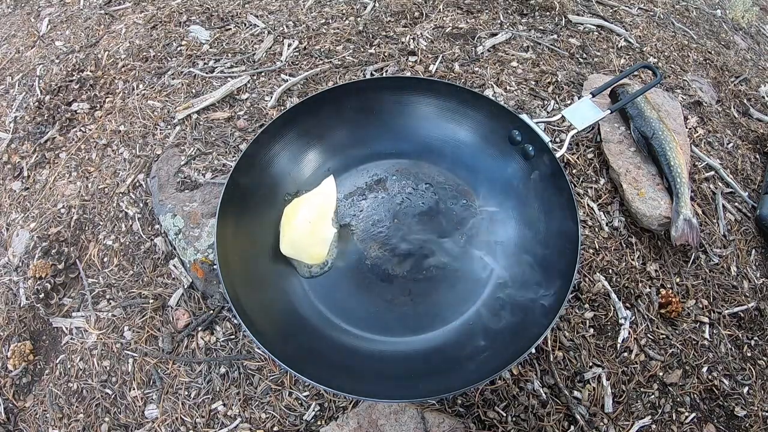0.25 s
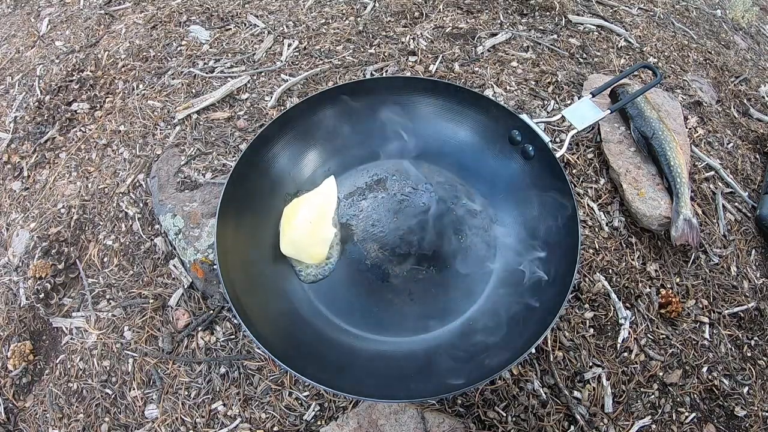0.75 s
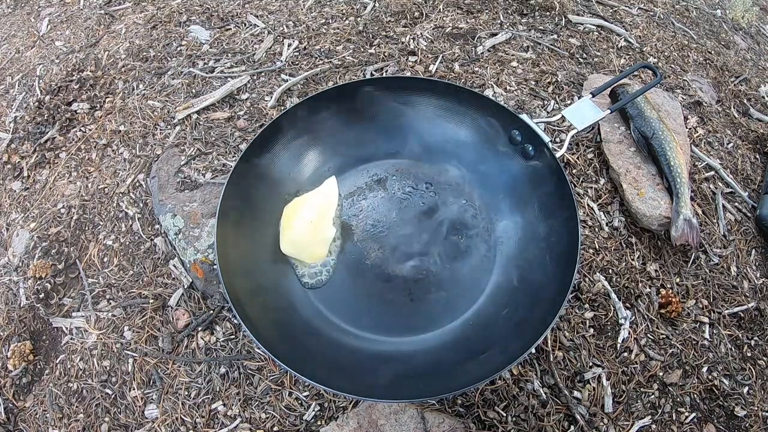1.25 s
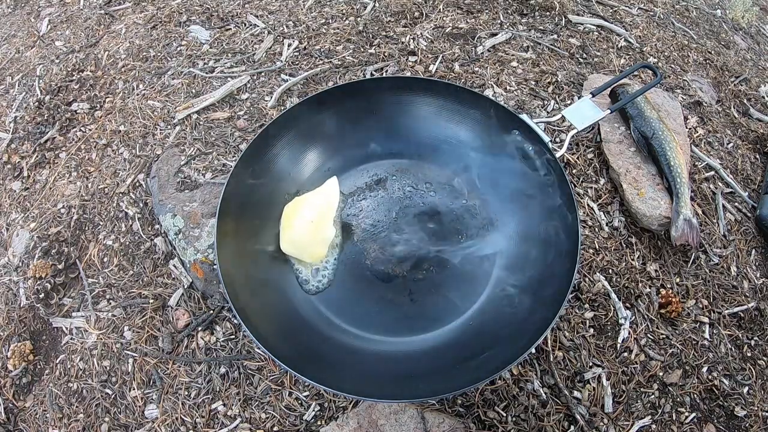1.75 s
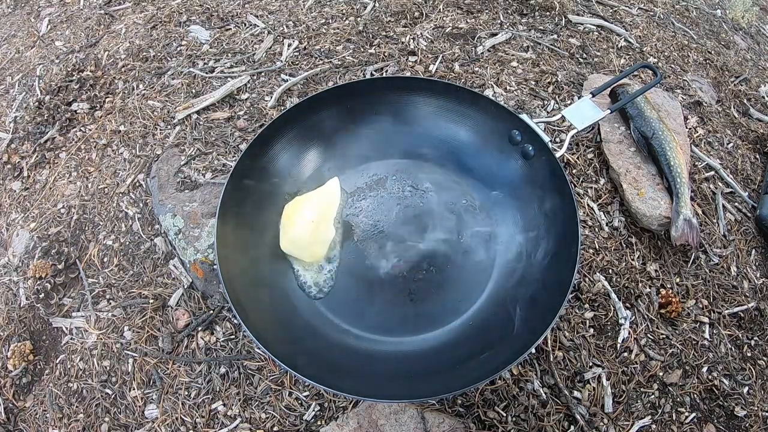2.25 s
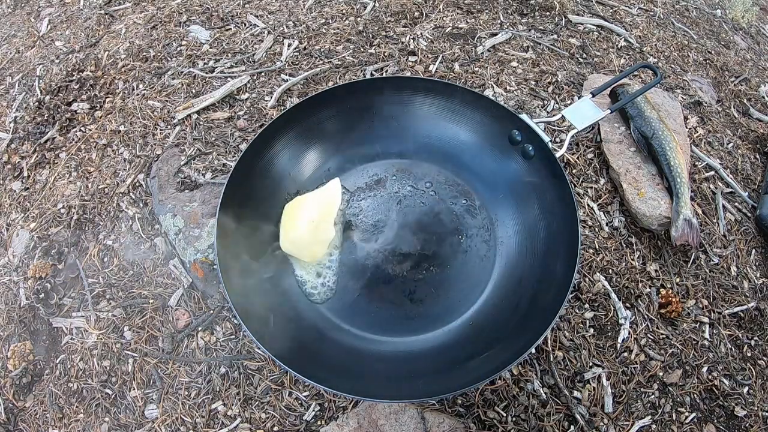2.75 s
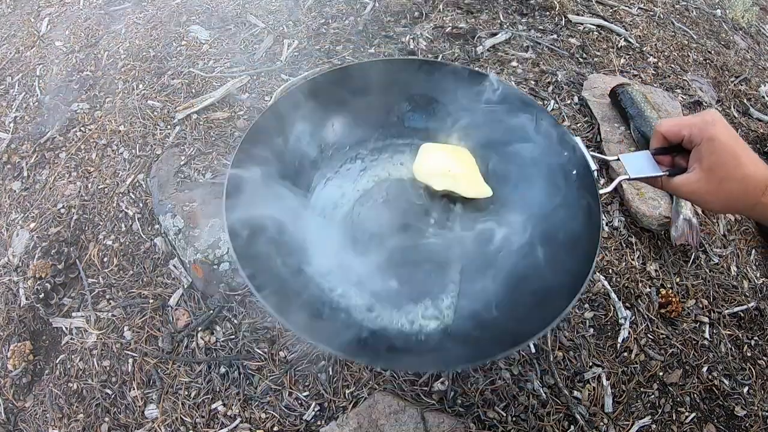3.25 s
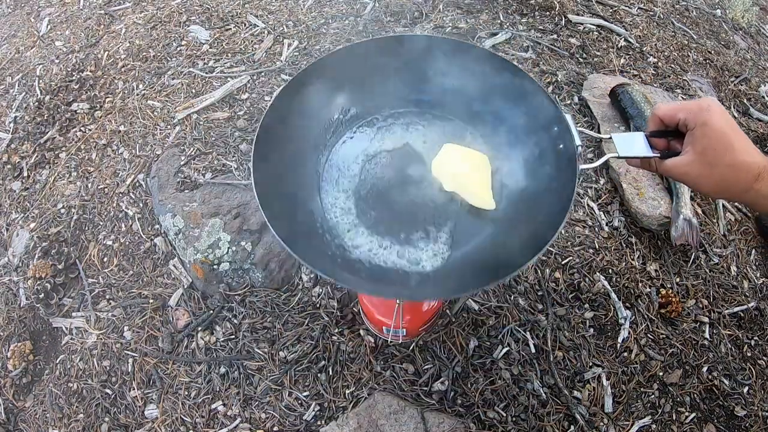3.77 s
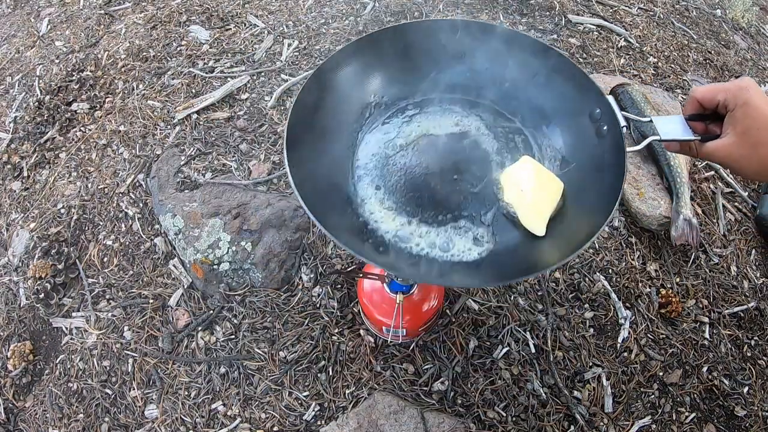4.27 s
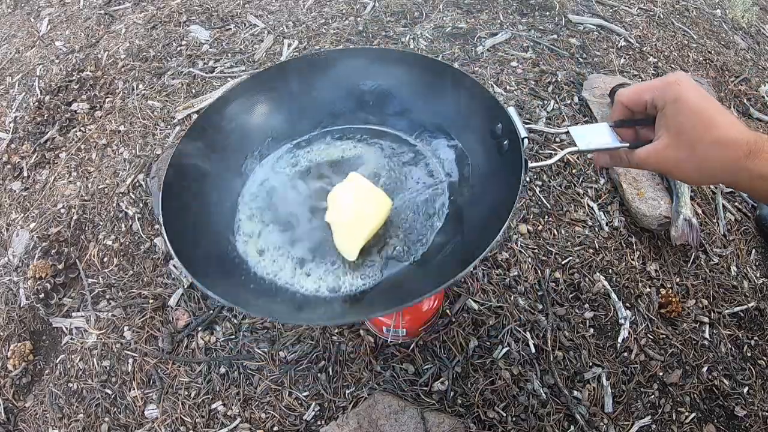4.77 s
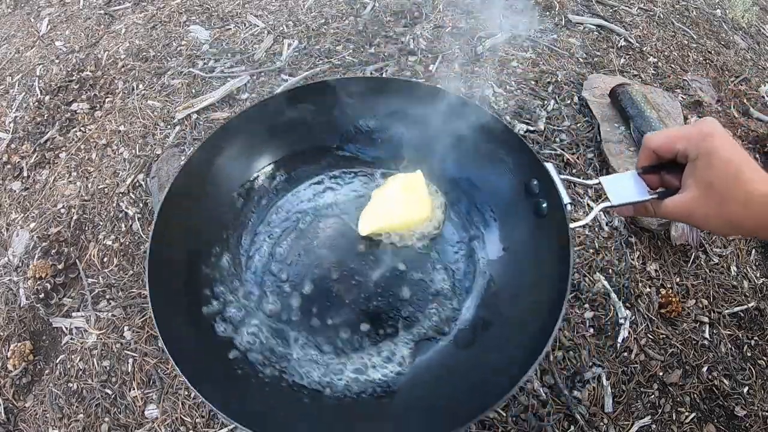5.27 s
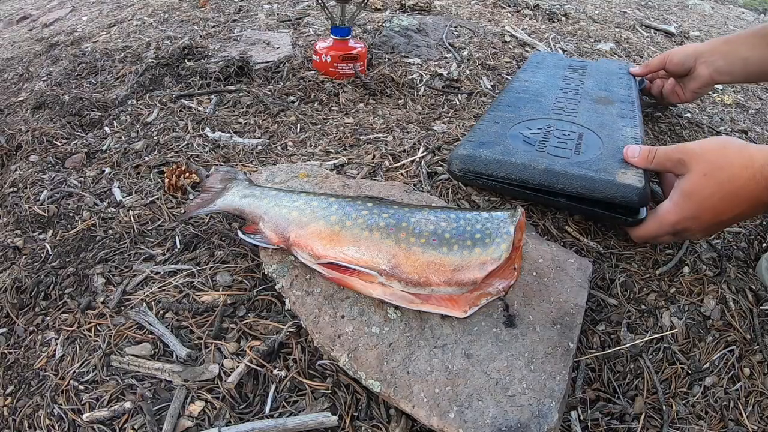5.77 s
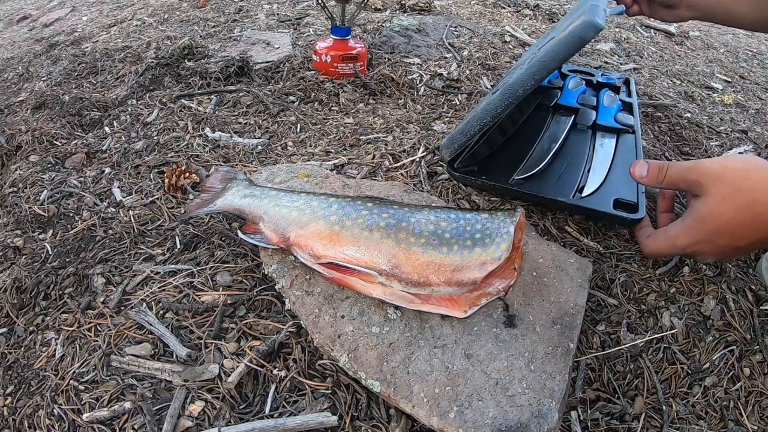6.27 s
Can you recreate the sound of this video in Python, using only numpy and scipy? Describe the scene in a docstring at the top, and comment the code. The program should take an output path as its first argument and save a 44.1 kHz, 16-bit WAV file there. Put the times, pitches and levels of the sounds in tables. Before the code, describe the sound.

Close crackling butter over a gas flame, sizzle surging with each tilt, a sharp metal clank, then faraway frying and a hollow plastic knock.

```python
"""Butter fizzes in a steel pan on a camp stove outdoors, under low gusts of wind on the microphone.
The pan is lifted and swirled: the melt flares up over hot metal, and the pan bumps and then clanks on the burner.
Then, abruptly, the frying is far away and a plastic knife case is opened.
Frying is dense random clicks and short ringing bubbles; pan and case are struck resonant modes;
wind, flame and air are coloured noise."""
import sys
import numpy as np
from scipy import signal
from scipy.fft import rfft, irfft, next_fast_len
from scipy.io import wavfile
from scipy.ndimage import uniform_filter1d

SR = 44100
rng = np.random.default_rng(int(sys.argv[2]) if len(sys.argv) > 2 else 0)


def materialize(psi):
    """Save the field psi as 16-bit PCM at rate SR to the path in sys.argv[1].

    A 1-D psi becomes a single channel; in a 2-D psi each row is a channel.
    """
    bounded = np.clip(np.atleast_2d(psi).T, -1, 1)
    quanta = np.round(bounded * 32767).astype(np.int16)
    wavfile.write(sys.argv[1], SR, quanta)


N = 287281
TIME = np.arange(N) / SR
LIFT_S = 2.965  # the pan leaves the flame and the melt starts to run


def from_db(db):
    """Decibels to gain."""
    return 10 ** (np.asarray(db) / 20)


def rms_one(x):
    """Scale to unit power."""
    return x / np.sqrt(np.mean(x ** 2) + 1e-20)


def even(x):
    """Hold unit power over every twentieth of a second; the grain stays."""
    return x / np.sqrt(np.abs(uniform_filter1d(x * x, SR // 20)) + 1e-12)


def in_time(rows):
    """Each column of a curve, interpolated at every sample."""
    s, *columns = np.transpose(rows)
    return [np.interp(TIME, s, column) for column in columns]


def lift(resting, lifted, lift_takes_s=0.035):
    """A quantity passes from its resting value to its lifted one as the pan comes up."""
    share = np.clip((TIME - LIFT_S) / lift_takes_s + .5, 0, 1)
    return (1 - share) * resting + share * lifted


def swells(rows, t60):
    """Joint gain of events that each rise, hold and die away; their powers add."""
    power = 1e-12
    for s, rise_s, hold_s, db in rows:
        attack = np.clip((TIME - s) / rise_s, 0, 1)
        release_db = -60 * np.maximum(TIME - s - rise_s - hold_s, 0) / t60
        power = power + (attack * from_db(db + release_db)) ** 2
    return np.sqrt(power)


def colour(x, points):
    """Causal (minimum-phase) filter that follows a spectrum."""
    size = 2 * next_fast_len(N)
    hz, db = np.transpose(points)
    bins = np.maximum(np.fft.rfftfreq(size, 1 / SR), 1)
    gain = from_db(np.interp(np.log(bins), np.log(hz), db))
    # folding the cepstrum onto positive time gives the minimum phase
    cepstrum = irfft(np.log(gain))
    cepstrum[1:size // 2] *= 2
    cepstrum[size // 2 + 1:] = 0
    response = np.exp(rfft(cepstrum))
    return irfft(rfft(x, size) * response)[:N]


def noise(points):
    """Coloured noise of unit power."""
    return rms_one(colour(rng.standard_normal(N), points))


def ring(x, hz, t60):
    """One mode: a two-pole resonator in which a click sets a decaying sine ringing."""
    radius = from_db(-60 / (t60 * SR))
    step = 2 * np.pi * hz / SR
    return signal.lfilter([0, np.sin(step)], [1, -2 * radius * np.cos(step), radius ** 2], x + 1e-18)


def ring_modes(force, modes):
    """A body's modes all ring from one force, in alternating polarity."""
    return sum((-1) ** k * from_db(db) * ring(force, hz, t60) for k, (hz, db, t60) in enumerate(modes))


def births(per_s, spread_db):
    """Random moments and sizes of bursts: many small ones, few large."""
    chance = rng.random(N)
    size = np.minimum(rng.standard_normal(N), 2.5)
    sign = rng.choice([-1, 1], N)
    born = chance < per_s / SR
    return born, (sign * from_db(spread_db * size))[born]


def pops(s, height, hz, cycles, size=160):
    """Each pop swells over about a tenth of its cycles, on a decay of 60 dB over all of them."""
    age = np.arange(size)
    turns = np.minimum(hz, .45 * SR)[:, None] * age / SR
    decay = np.log(1000) * turns / cycles
    envelope = 4 * (np.exp(-decay) - np.exp(-2 * decay))
    wave = envelope * np.sin(2 * np.pi * turns)
    at = (s * SR).astype(int)[:, None] + age
    return np.bincount(at.ravel(), (height[:, None] * wave).ravel(), N + size)[:N]


def single_pops(rows, cycles, crack_db):
    """Lone pops: a broad crack and a short ring."""
    s, db, hz = np.transpose(rows)
    tone = pops(s, from_db(db), hz, cycles, size=400)
    crack = pops(s, from_db(db + crack_db), hz, cycles=6)
    return tone + crack


def crackle(per_s, spread_db, points):
    """Countless tiny snaps, each a single coloured click."""
    born, height = births(per_s, spread_db)
    clicks = np.zeros(N)
    clicks[born] = height
    return even(colour(clicks, points))


def bubbles(per_s, hz, pitch_spread, spread_db, cycles):
    """Bubbles of scattered sizes ring briefly as they open."""
    born, height = births(per_s, spread_db)
    pitch = (hz * np.exp(pitch_spread * rng.standard_normal(N)))[born]
    return even(pops(TIME[born], height, pitch, cycles, size=240))


def showers(per_s, spread_db, t60, depth):
    """A burst throws droplets that fry at once: the sizzle jumps up and dies back. Returns a gain."""
    born, height = births(per_s, spread_db)
    kicks = np.zeros(N)
    kicks[born] = height ** 2
    power = signal.lfilter([1], [1, -from_db(-120 / (t60 * SR))], kicks + 1e-12)
    return np.sqrt(1 + depth * power / power.mean())


def bowl(x, wet_db, t60):
    """The pan's walls throw each burst back and forth for a few milliseconds."""
    age = TIME[:SR // 25]
    echoes = rng.standard_normal(len(age)) * from_db(-60 * age / t60) * (age > .001)
    echoes = echoes / np.linalg.norm(echoes)
    return x + from_db(wet_db) * signal.fftconvolve(x, echoes)[:N]


def side_noise():
    """A faint wide bed of noise, in opposite polarity left and right."""
    bed = noise([(30, -1), (150, 8.5), (1000, 3), (3000, -32), (15000, -30)])
    return from_db(-76) * bed * np.array([[1], [-1]])


# spectrum of the air away from the stove: f/Hz, level/dB (relative)
AIR_COLOUR = [(20, -12), (60, -14), (130, -0.5), (200, 3), (280, -2), (400, -2.5), (530, -10), (760, -6.5),
              (1050, -18), (2500, -33)]
AIR_DB = -49.5


def distant_air():
    """A steady low bed of air noise, away from the stove."""
    return from_db(AIR_DB) * noise(AIR_COLOUR)


# the breeze on the microphone dies down: t/s, level/dB
BREEZE = [(0, -27), (2.2, -35.5), (4.4, -38), (5.4, -54), (6.5, -58)]
# gusts on top of it: t/s, rise/s, hold/s, level/dB
GUSTS = [(0, 0.07, .05, -20.5), (.2, 0.077, 0.071, -12.5), (.8, 0.074, 0.17, -23.5), (1.2, 0.042, .04, -27),
         (1.42, 0.066, 0.036, -20), (2.94, 0.085, 0.057, -17.5), (3.23, 0.037, 0.25, -24.5),
         (3.64, 0.057, 0.09, -24.5), (4.7, .12, 0.066, -31)]
GUST_T60 = 0.55  # s


def wind(full_gust_db=-11):
    """Eddies push slowly on the microphone; strong gusts break into smaller, quicker ones."""
    gust_gain = np.hypot(from_db(in_time(BREEZE)[0]), swells(GUSTS, GUST_T60))
    gust_db = 20 * np.log10(gust_gain)
    large = noise([(3, -9.0), (7, 9.0), (13, 12.5), (22, 2.5), (32, -6.5), (45, -13.0), (60, -20.5),
                   (85, -40), (150, -45), (600, -64)])
    large = large / np.sqrt(uniform_filter1d(large ** 2, SR // 5))
    small = noise([(15, -28), (35, -1), (55, 5), (70, -3), (100, -26), (160, -40), (600, -80)])
    # the small eddies gain on the large ones as a gust strengthens
    small_gain = from_db(-16.5 + 0.86 * (gust_db - full_gust_db))
    return gust_gain * (large + small_gain * small)


# spectrum of the gas flame: f/Hz, level/dB (relative)
FLAME_COLOUR = [(20, 1), (60, -13), (110, 2), (160, 2.5), (240, -2), (370, -2.5), (600, -7.5), (900, -10.5),
                (2000, -7.5), (5000, -26.5)]
FLAME_DB = -46.5
FLAME_ON_PAN_DB, FLAME_LIFTED_DB = -50, -62.5  # hollow roar under the steel: pan resting, pan lifted


def burner():
    """The gas flame rushes steadily and roars hollowly where it meets the pan."""
    hollow = noise([(120, -20.0), (250, -3.5), (400, 1), (560, -2.0), (750, -13.5), (1500, -29)])
    hollow_gain = from_db(lift(FLAME_ON_PAN_DB, FLAME_LIFTED_DB))
    return from_db(FLAME_DB) * noise(FLAME_COLOUR) + hollow_gain * hollow


# spectrum of the frying at a distance: f/Hz, level/dB (relative)
FAR_COLOUR = [(600, -18), (1000, -15), (1450, 0), (2100, -10), (2600, 0), (3300, -3.5), (4450, 3.5),
              (5100, -4), (6300, -4), (7000, -2.5), (7700, -4.5), (9600, -4), (11500, -10.5), (13000, -19),
              (15500, -33)]
FAR_DB = -45


def distant_frying():
    """The butter heard from some steps away: surging crackle and pitched bubbles in the pan's bowl."""
    surge = showers(180, spread_db=4.0, t60=0.0078, depth=0.95)
    fizz = even(surge * crackle(14000, spread_db=3.5, points=FAR_COLOUR))
    boil = from_db(-1.5) * bubbles(800, 3810, pitch_spread=0.14, spread_db=6.0, cycles=23.0)
    return from_db(FAR_DB) * bowl(fizz + boil, wet_db=-8.0, t60=0.023)


# the lid comes free: t/s, strength level/dB
LID_KNOCKS = [(5.7176, -25.5), (5.7216, -38)]
# modes of the plastic case: f/Hz, level/dB, t60/s
CASE_MODES = [(250, -11, 0.07), (310, -7, .05), (407, -2, 0.074), (560, -10, 0.044), (710, -8.5, .03),
              (1040, -0.5, 0.0085), (1430, -9, 0.018), (1980, -9, 0.0093)]
# the case rubs on the ground litter: t/s, rise/s, hold/s, level/dB
CASE_RUBS = [(5.73, 0.026, .01, -45.5), (5.88, .08, 0.066, -53), (6.31, 0.062, 0.028, -45)]
RUB_T60 = 0.43  # s
# small ticks as the case is handled: t/s, level/dB (relative), f/Hz
TICKS = [(5.7608, -30, 3720), (5.8566, -28, 2870), (6.0212, -23.5, 3000), (6.121, -36, 3940),
         (6.1429, -32, 4440), (6.2133, -29, 3270), (6.2342, -29, 3760), (6.4335, -23, 9600),
         (6.4632, -24, 3720)]


def knife_case():
    """The plastic lid comes free with a hollow modal knock, then ticks and rustles as it is raised."""
    force = sum(from_db(db) * signal.unit_impulse(N, int(s * SR)) for s, db in LID_KNOCKS)
    knock = ring_modes(force, CASE_MODES)
    rustle = crackle(2500, spread_db=-1.5,
                     points=[(300, -13), (750, 5), (1500, -1), (3000, 0), (7000, -13), (14000, -29)])
    ticks = from_db(0.5) * single_pops(TICKS, cycles=8.2, crack_db=-14)
    return knock + swells(CASE_RUBS, RUB_T60) * rustle + ticks


# pan against the burner: t/s, strength level/dB, lowest contact f/Hz, highest contact f/Hz, scrape level/dB
PAN_HITS = [(3.7332, -3, 414, 1520, -25), (5.6239, -2, 1230, 14500, -4)]
# modes of the steel pan: f/Hz, level/dB, t60/s
PAN_MODES = [(602, -12, 0.018), (739, -21.5, 0.3), (822, -34, 0.28), (1026, -31.5, 0.12),
             (1320, -19, 0.012), (1860, -12, 0.014), (2060, -28, 0.11), (3210, -18, 0.095),
             (4565, -6, 0.052), (6130, -8.5, 0.057), (7280, -8, 0.057), (8580, -2.5, 0.09),
             (9300, -15, .06), (9870, -8, 0.075), (9960, -6, 0.046), (10640, -8, 0.062),
             (10680, -3.5, 0.054), (11650, -9, 0.076), (12740, -12, 0.076)]


def pan(scrape_t60=0.064, chatter_db=-42):
    """Steel meets the burner's prongs: a blow, then a dying chatter, rings the pan's modes."""
    force, scrape = np.zeros(N), np.zeros(N)
    grit = noise([(100, -9.5), (700, -17), (2000, -15), (4500, 3), (6000, 0), (8500, 4.0), (10300, 9),
                  (12500, -2), (15500, -11.0)])
    for s, db, low_hz, high_hz, scrape_db in PAN_HITS:
        fade = (TIME >= s) * from_db(scrape_db - 60 * np.abs(TIME - s) / scrape_t60)
        blow = signal.unit_impulse(N, int(s * SR)) + from_db(chatter_db) * fade * grit
        # a soft bump reaches only the low modes, a sharp edge mostly the high ones
        contact = signal.butter(2, [low_hz, high_hz], "band", fs=SR, output="sos")
        force += from_db(db) * signal.sosfilt(contact, blow)
        scrape += fade * grit
    return scrape + ring_modes(force, PAN_MODES)


# steam squeezes out from under the lump: t/s, rise/s, hold/s, level/dB
SQUEEZES = [(3.35, 0.053, .04, -29), (4.34, 0.047, .04, -23), (5.1, 0.067, .02, -32.5),
            (5.26, .03, .04, -29.5)]
SQUEEZE_RELEASE_T60 = .2  # s
SQUEEZE_HZ, SQUEEZE_T60 = 4800, 0.012  # whistle of the gap: pitch (Hz), ring time (s)


def squeeze():
    """Steam chatters through a narrow gap and whistles faintly in it."""
    jet = showers(90, spread_db=1.5, t60=0.015, depth=2.5) * rng.standard_normal(N)
    return swells(SQUEEZES, SQUEEZE_RELEASE_T60) * even(ring(jet, SQUEEZE_HZ, SQUEEZE_T60))


# the loudest spits, and last a small knock just after the clank: t/s, level/dB (relative), f/Hz
SPITS_AND_KNOCK = [(0.153, -11, 6300), (0.2558, -9, 8600), (0.354, -12, 7070), (0.4343, -11.5, 8370),
                   (1.2194, -15, 7890), (1.5067, -14, 5100), (2.0712, -10, 6200), (2.163, -17, 4300),
                   (2.2424, -9.5, 4700), (2.3431, -11, 4970), (2.7596, -11, 5100), (3.0223, -10, 3700),
                   (3.305, -11, 3500), (3.6471, -7, 4540), (5.1905, -8.5, 5030), (5.228, -4, 11000),
                   (5.6524, -6, 4440)]
SPITS_PER_S, SMALL_SPIT_DB, SPIT_HZ = 9, -22, 5940  # lesser drops: rate, typical level, typical pitch


def spits_and_knock(loud_db=-3, pitch_spread=0.2):
    """Drops of water burst in the fat, a few loud, lesser ones at random; a small knock follows the clank."""
    born, height = births(SPITS_PER_S, spread_db=4.0)
    pitch = (SPIT_HZ * np.exp(pitch_spread * rng.standard_normal(N)))[born]
    small_db = SMALL_SPIT_DB + 20 * np.log10(np.abs(height))
    lesser = single_pops(list(zip(TIME[born], small_db, pitch)), cycles=13.0, crack_db=0)
    loud = from_db(loud_db) * single_pops(SPITS_AND_KNOCK, cycles=16.3, crack_db=-5)
    return loud + lesser


# the pool at rest: level at the start (dB) and growth as the lump melts (dB per s)
POOL_FIZZ_DB, FIZZ_DB_PER_S = -29, 0.32
POOL_BOIL_DB, BOIL_DB_PER_S = -40, 3.5
POOL_SPLUTTER_DB, SPLUTTER_DB_PER_S = -53.5, 3
# the melt spread over the lifted pan: steady levels (dB); bubbles lost as its water boils off (dB per s)
SPREAD_FIZZ_DB, SPREAD_SPLUTTER_DB, DRYING_DB_PER_S = -25.5, -44, 2
# each tilt runs the melt over hot steel:
# t/s, rise/s, hold/s, fizz level/dB, steam bubble level/dB, splutter level/dB
SWIRLS = [(2.95, 0.026, 0.13, -25, -40, -44), (3.168, 0.096, .03, -22, -24.5, -40.5),
          (3.344, 0.075, 0.15, -22.5, -23, -41), (3.663, 0.044, 0.11, -23.5, -26, -44),
          (3.842, .09, 0.11, -22, -22, -40.5), (4.153, 0.067, 0.08, -28.5, -23, -41),
          (4.321, 0.11, 0.099, -17.5, -21.5, -38), (4.667, 0.023, 0.26, -27, -35.5, -47),
          (5.163, 0.061, 0.062, -25, -33, -38)]
SWIRL_T60 = 0.53  # s


def melt():
    """Gains of fizz, steam bubbles and splutter: the pool grows, is spread out, and flares at every tilt."""
    fizz_db = lift(POOL_FIZZ_DB + FIZZ_DB_PER_S * TIME, SPREAD_FIZZ_DB)
    drying_db = BOIL_DB_PER_S * LIFT_S - DRYING_DB_PER_S * (TIME - LIFT_S)
    boil_db = POOL_BOIL_DB + lift(BOIL_DB_PER_S * TIME, drying_db)
    splutter_db = lift(POOL_SPLUTTER_DB + SPLUTTER_DB_PER_S * TIME, SPREAD_SPLUTTER_DB)
    s, rise_s, hold_s, *flares_db = np.transpose(SWIRLS)
    gains = []
    for steady_db, flare_db in zip((fizz_db, boil_db, splutter_db), flares_db):
        flare = swells(zip(s, rise_s, hold_s, flare_db), SWIRL_T60)
        gains.append(np.hypot(from_db(steady_db), flare))
    return gains


# spectra of snapping foam, thin film, steam bubbles and splutter: f/Hz, level/dB (relative)
FOAM_COLOUR = [(1500, -27.5), (3000, -15), (3800, -1.5), (4800, -10.5), (6200, -0.5), (7400, -5.5),
               (8700, 3.5), (9800, -3.5), (11200, -1.5), (13000, -7), (15600, -13)]
FILM_COLOUR = [(1500, -25.5), (2600, -12.5), (4000, -3.5), (5000, -3.5), (6500, -2), (8000, -0.5),
               (9000, 0), (10200, 0.5), (11500, -1), (13000, -6), (15600, -12.5)]
BOIL_COLOUR = [(1000, -37), (2800, -3), (3700, 0), (4700, -1), (5400, 1), (7000, 2), (12000, -40.5)]
SPLUTTER_COLOUR = [(350, -30), (730, -4), (1000, -5), (1500, -2), (2100, 0.5), (2900, -2.5), (3800, -12),
                   (6000, -29)]
# typical pitch of the steam bubbles: t/s, f/Hz
BOIL_PITCH = [(0.8, 4720), (2.72, 4740), (4.17, 4554), (5.09, 4900), (5.6, 4500)]
# larger bubbles gather under the sliding lump: t/s, rise/s, hold/s, level/dB
GURGLES = [(3.22, .1, 0.32, -38), (3.93, 0.073, .04, -35), (4.38, 0.097, .1, -37.5),
           (5.31, 0.041, 0.027, -40.5), (5.47, 0.063, 0.15, -39.5)]
# their pitch at the lift (Hz), its sag as they grow (Hz per s), and release (s)
GURGLE_HZ, GURGLE_SAG_HZ_PER_S, GURGLE_T60 = 3120, 150, 1.0
# share of the fizz from thin film, not foam, just before the lift (0-1); power of time it grows with
FILM_AT_LIFT, FILM_GROWTH = 0.55, 1.8


def frying(film_crowding=.6):
    """Water boils out of the butter; the more melt meets hot steel, the denser and louder the bursts."""
    fizz_gain, boil_gain, splutter_gain = melt()
    film = np.clip(lift(FILM_AT_LIFT * (TIME / LIFT_S) ** FILM_GROWTH, 1), 0, 1)
    activity = (fizz_gain / np.median(fizz_gain)) ** film_crowding

    # bursts come in clumps, and each spurts steam for a few milliseconds
    clumps = showers(120 * activity, spread_db=-3.0, t60=0.049, depth=0.42)
    spurts = showers(480 * activity, spread_db=3.5, t60=0.0042, depth=0.37)
    surge = clumps * spurts

    foam = crackle(22000, spread_db=4.5, points=FOAM_COLOUR)
    foam += from_db(-3.5) * bubbles(760, 7370, pitch_spread=0.21, spread_db=6.0, cycles=15.0)
    spray = crackle(32000, spread_db=1.0, points=FILM_COLOUR)
    spray += from_db(-20.0) * bubbles(900, 10530, pitch_spread=0.21, spread_db=4.0, cycles=37.0)
    fizz = even(surge * (np.sqrt(1 - film) * foam + np.sqrt(film) * spray))

    boil = bubbles(2000 * activity, in_time(BOIL_PITCH)[0], pitch_spread=.17 - 0.069 * film,
                   spread_db=2.0, cycles=18.0)
    boil = even(np.sqrt(surge) * colour(boil, BOIL_COLOUR))

    gurgle_hz = GURGLE_HZ - GURGLE_SAG_HZ_PER_S * (TIME - LIFT_S)
    gurgle = bubbles(1000, gurgle_hz, pitch_spread=0.028, spread_db=4.0, cycles=11.5)
    gurgle_gain = swells(GURGLES, GURGLE_T60)

    splutter = even(surge * crackle(7000 * activity, spread_db=2.0, points=SPLUTTER_COLOUR))
    return fizz_gain * fizz + boil_gain * boil + gurgle_gain * gurgle + splutter_gain * splutter


AWAY_S = 5.675  # the listening point jumps away from the pan


def scene(fade_s=0.0041):
    """Close over the pan, then some steps away; all but the faint wide noise sits in the centre."""
    near = np.clip((AWAY_S - TIME) / fade_s + .5, 0, 1)
    in_bowl = bowl(frying() + spits_and_knock(), wet_db=-11.5, t60=0.027)
    stove = in_bowl + squeeze() + pan() + burner()
    away = distant_frying() + distant_air() + knife_case()
    return near * stove + (1 - near) * away + wind() + side_noise()


CUTOFF_HZ = 15720


def record(dry):
    """The loudest peaks overload; the top is cut."""
    clipped = np.clip(dry, -1, 1)
    low_pass = signal.ellip(14, .1, 90, CUTOFF_HZ, fs=SR, output="sos")
    return signal.sosfilt(low_pass, clipped)


dry = scene()
out = record(dry)
materialize(out)
```